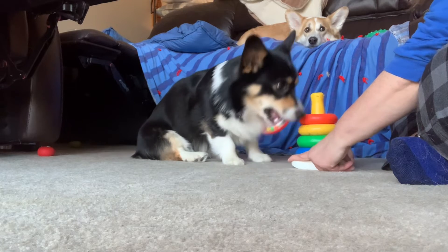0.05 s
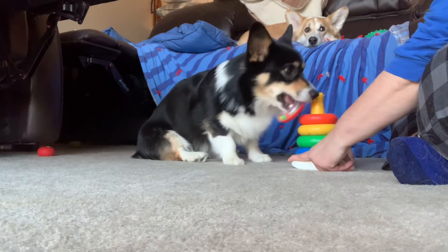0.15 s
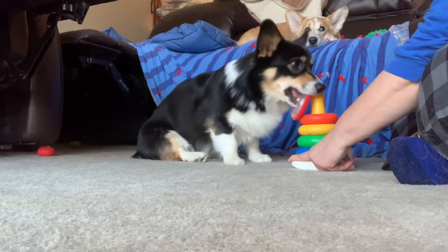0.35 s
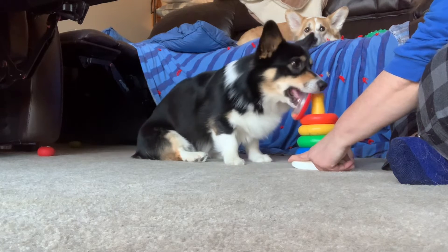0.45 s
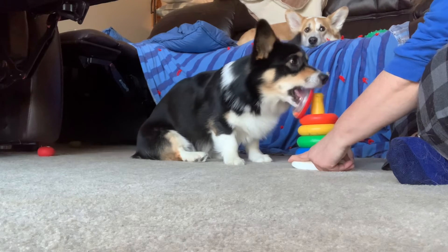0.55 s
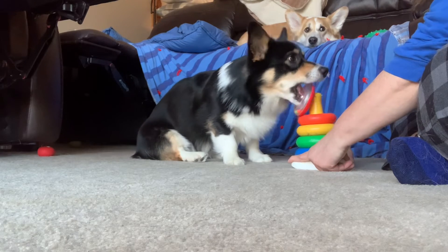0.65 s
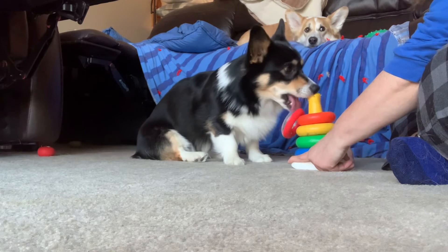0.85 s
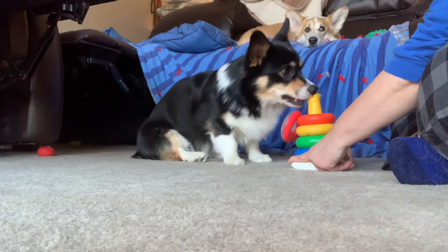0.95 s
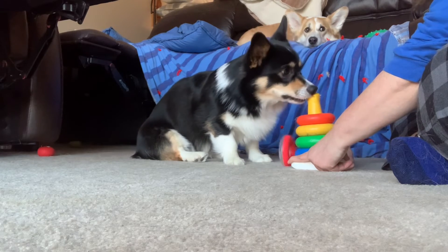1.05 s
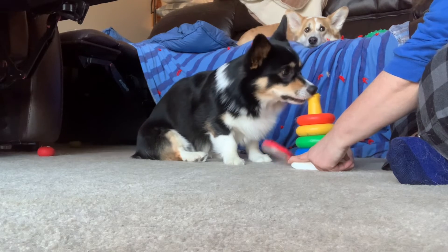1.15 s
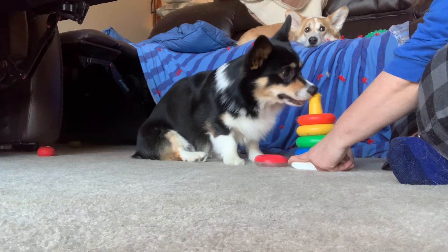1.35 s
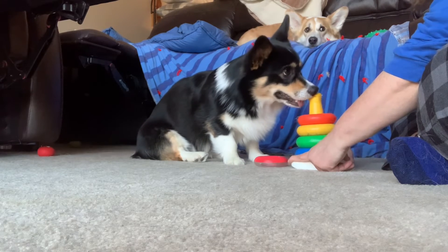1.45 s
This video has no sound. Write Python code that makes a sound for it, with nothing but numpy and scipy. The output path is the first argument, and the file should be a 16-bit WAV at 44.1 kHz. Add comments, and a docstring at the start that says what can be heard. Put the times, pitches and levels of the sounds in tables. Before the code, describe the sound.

Plastic toy ring clacking on a post and a dog's teeth, then falling with a rattle.

```python
"""A carpeted living room on a stereo microphone pair, near a dog working a ring against a stacking toy. A low
hum and faint room noise run throughout. The hollow plastic ring cracks and knocks on the post, then at 0.2 s
clicks on the dog's teeth, with dull thuds through the floor. From 0.6 s it scrapes along the post and knocks
again. Near 1.2 s it drops on the carpet, its beads rattle, and a bead rings with two brief, rough high tones.
Every contact reaches the microphones with the short echo of the room."""
import sys
import numpy as np
from scipy import signal
from scipy.fft import rfft, irfft
from scipy.io import wavfile
from scipy.ndimage import uniform_filter1d

SR = 44100
rng = np.random.default_rng(int(sys.argv[2]) if len(sys.argv) > 2 else 0)


def int16_out(signal):
    """Quantize to a 16-bit WAV file."""
    q = np.round(np.clip(np.atleast_2d(signal).T, -1, 1) * 32767)
    wavfile.write(sys.argv[1], SR, q.astype(np.int16))


N = 66150
LEAD = SR // 5  # samples for contacts that ring in from before time zero
LOW_LAG_S, HIGH_LAG_S, CLICK_PAN_DB = .0003, -.00018, -2.5  # nominal left against right, see place()

# steady hum in the room: (frequency [Hz], rms level [dB])
HUM_PARTIALS = [(80.7, -58.5), (161.5, -69)]
# spectrum of the room noise: (frequency [Hz], relative level [dB])
ROOM_TONE = [(20, -12.5), (40, -13), (65, -13.5), (120, -1.5), (220, -16.5), (400, -22.5), (700, -27.5),
             (1200, -32.5), (2500, -37), (6000, -37.5), (13500, -39.5), (15000, -60)]
# high modes of the ring: (frequency [Hz], relative level [dB], t60 [s])
RING_MODES = [(3220, -11, 0.16), (4016, 2, 0.085), (5540, -19, 0.3), (6070, -16.5, 0.2), (5800, -8, .14),
              (6900, -16.5, 0.069), (7072, -2, 0.05), (7580, -1, 0.056), (11100, -5.5, 0.082),
              (10200, 4, 0.065), (11100, -8.5, .09), (12790, -17.5, 0.031)]
# hard cracks of the rim on the toy: (time [s], level [dB], middle boost [dB], top boost [dB])
RIM_HITS = [(-.06, -26.5, 3, -10.5), (.095, -73, 31.5, -10.5), (.178, -35.5, 14.5, 2),
            (.1865, -30, 14, 3.5), (.192, -23, -20, -3), (.2062, -18.5, 9, 9), (.2088, -12.5, -3, 2),
            (.2102, -7, 0, 6.5), (.2135, -20, 4, -5), (.2775, -30, 3.5, 7.5), (.5825, -49, 22.5, -2.5),
            (.7908, -35.5, 14.5, 2.5), (.7985, -29, 11, -4.5), (.803, -35.5, 18, 3), (.9855, -40, 10, 11),
            (.988, -37.5, 19, 2), (.998, -36.5, 16, -12), (1.0048, -39, 12.5, 7), (1.474, -59, 14, -8),
            (1.491, -48.5, 0.5, -28)]
# spectrum of a rim crack: (frequency [Hz], gain [dB])
RIM_EQ = [(80, -16), (400, 4.5), (900, -3.5), (1200, -10.5), (1560, 1), (2150, -3.5), (2500, -4.5),
          (3200, 2), (4200, -2), (5400, 1.5), (6700, 5.5), (8600, -1.5), (11500, -1), (13500, -2.5),
          (15500, -29)]
# ring knocking on the toy: (time [s], level [dB], pitch [Hz], body mode [Hz], body gain [dB], pan [dB])
POST_KNOCKS = [(-.02, -37, 587, 314, -10.5, 0), (.1795, -43.5, 986, 464, -3, -2),
               (.183, -35, 844, 424, -7, -4), (.191, -47, 810, 388, 0.5, 21),
               (0.2077, -15, 824.4, 412.5, -11.5, -2.5), (0.585, -46, 1040, 415, -14, -6.5),
               (.6285, -34.5, 606, 389, -7, -2), (.64, -46.5, 432, 213, -6, 13),
               (.664, -44, 574, 214, -2.5, 0.5), (.697, -47, 780, 377, -4.5, -4.5),
               (.7275, -34.5, 624, 384, -22, -1), (.792, -24.5, 755, 474, -12, -10.5),
               (0.8002, -23, 838, 490, -2.5, -2.5), (.8185, -42.5, 516, 356, 7, 5.5),
               (0.9874, -23, 657, 335.5, -14.5, -0.5), (0.9875, -36.5, 1102, 231, -6, -10),
               (1.004, -39.5, 830, 326, -9, -4), (1.0107, -38, 444, 348, -1.5, -2),
               (1.169, -51, 990, 449, 2.5, 1), (1.282, -58, 587, 297, -14.5, -5),
               (1.474, -56, 820, 449, -1, -7.5)]
# upper modes of the hollow toy: (multiple of the pitch [ratio], relative level [dB], t60 [s])
SHELL_MODES = [(1.18, -22.5, 0.012), (1.63, -32.5, 0.09), (2.4, -28.5, 0.019)]
# teeth slipping on the ring: (time [s], level [dB], middle boost [dB], top boost [dB])
TOOTH_HITS = [(.196, -15.5, -16, -3), (.2604, -13, -7, -6), (.662, -32, 13, -14), (.705, -25, 0.5, -7.5)]
# spectrum of a tooth click: (frequency [Hz], gain [dB])
TOOTH_EQ = [(300, -30), (2000, -21.5), (3200, -8.5), (4500, -7.5), (6000, -3), (7000, 0.5), (8500, -3),
            (12500, -6.5), (15500, -17)]
# thuds through the carpet and the toy's base: (time [s], level [dB], pitch [Hz], t60 [s])
FLOOR_THUDS = [(.214, -43, 165, 0.094), (0.226, -44.5, 99, 0.14), (0.237, -55.5, 59.5, 0.15),
               (0.242, -53, 158.8, 0.16), (0.596, -47, 135.5, 0.075), (.712, -53, 224, 0.064),
               (0.804, -35, 219.5, 0.06), (0.812, -37, 87.6, 0.046), (0.9912, -29, 249, 0.028),
               (1.025, -37, 70.5, 0.096), (1.029, -48.5, 200, 0.084), (1.173, -29, 287.5, 0.021),
               (1.1756, -31.5, 80, 0.067), (1.202, -41.5, 170, 0.035), (1.246, -48, 118.4, 0.082),
               (1.304, -53, 68.7, 0.21), (1.48, -48.5, 174, 0.063)]
# ring sliding on the post: (time [s], length [s], level [dB], first pitch [Hz], last pitch [Hz])
POST_SCRAPES = [(0.582, 0.017, -46, 875, 255), (0.605, 0.048, -53.5, 627, 550),
                (0.701, 0.038, -48, 352, 927)]
# the dropped ring clattering: (time [s], level [dB], middle boost [dB], top boost [dB])
CLATTER_HITS = [(1.188, -23.5, -2, 11.5), (1.1897, -21, -1, 8.5), (1.1995, -28, 9.5, 1),
                (1.2042, -15.5, -1, -0.5), (1.215, -25.5, 0.5, 4), (1.2465, -37, -11, 1),
                (1.251, -25, -13.5, 4.5), (1.2888, -26, -6.5, 0.5), (1.302, -31, -11, -5.5)]
# spectrum of the clatter and the beads: (frequency [Hz], gain [dB])
CLATTER_EQ = [(200, -17), (750, -19), (1150, -32), (1500, -2.5), (2100, -11.5), (2650, -16), (3200, 0.5),
              (3700, -7), (4200, -7.5), (5400, 3), (7000, -2), (8600, -3), (11500, -3), (13800, -7.5),
              (15200, -39.5)]
# brief high rings of a bead: (time [s], level [dB], pitch [Hz])
BEAD_PINGS = [(1.289, -52, 6360), (1.296, -51, 4210)]
# decay of the living room: (frequency [Hz], t60 [s])
ROOM_DECAY = [(80, 1), (200, 0.52), (340, 0.37), (520, 0.42), (850, 0.23), (1700, 0.28), (3500, .33),
              (6000, 0.29), (10000, 0.17), (15000, 0.09)]
# likeness of diffuse sound at the two microphones: (frequency [Hz], correlation [0-1])
MIC_COHERENCE = [(80, .95), (300, 0.56), (1000, 0.035), (4000, 0.04), (15000, 0.24)]


def amp(db):
    """Decibels to gain."""
    return 10 ** (np.asarray(db) / 20)


def read(points, hz):
    """Reads a table on a log-frequency axis."""
    f, value = np.transpose(points)
    return np.interp(np.log(hz + 1), np.log(f + 1), value)


def unit(x):
    """Scales to energy one."""
    return x / np.sqrt(np.sum(x ** 2, -1, keepdims=True) + 1e-20)


def decay(t, t60):
    """Falls 60 dB in t60 seconds."""
    return np.exp(-np.log(1000) * t / t60)


def mode(t, hz, t60):
    """One dying sine."""
    return np.sin(2 * np.pi * hz * t) * decay(t, t60)


def minimum_phase(db):
    """Shortest impulse response with the given spectrum."""
    cepstrum = irfft(np.log(amp(db)))
    half = len(cepstrum) // 2
    cepstrum[1:half] *= 2
    cepstrum[half + 1:] = 0
    return irfft(np.exp(rfft(cepstrum)))


def flatten(x, bins):
    """Evens out the peaks and dips of a noise burst's spectrum."""
    spectrum = rfft(x)
    power = abs(uniform_filter1d(abs(spectrum) ** 2, bins))
    return irfft(spectrum / np.sqrt(power + 1e-20), x.shape[-1])


def place(mix, time_s, sound, pan_db, lag_s):
    """Sets a sound on the pair: the left microphone is louder by 0.9 * pan_db, later by 0.9 * lag_s."""
    for channel, side in ((0, 0.45), (1, -0.45)):
        start = max(LEAD + round(time_s * SR) + round(side * lag_s * SR), 0)
        part = mix[channel, start:start + len(sound)]
        part += amp(side * pan_db) * sound[:len(part)]


def diffuse_noise(size):
    """Noise from all sides at the two microphones, alike in the bass."""
    left, other = rfft(rng.standard_normal((2, size)))
    likeness = read(MIC_COHERENCE, np.fft.rfftfreq(size, 1 / SR))
    right = likeness * left + np.sqrt(1 - likeness ** 2) * other
    return irfft([left, right], size)


def room_tone(noise_rms_db=-69):
    """The room by itself: a steady low hum in dull noise."""
    t = np.arange(N) / SR
    colour = amp(read(ROOM_TONE, np.fft.rfftfreq(N, 1 / SR)))
    air = irfft(rfft(diffuse_noise(N)) * colour, N)
    hum = sum(np.sqrt(2) * amp(db) * np.sin(2 * np.pi * (hz * t + rng.random()))
              for hz, db in HUM_PARTIALS)
    return amp(noise_rms_db) * np.sqrt(N) * unit(air) + hum


def clicks(hits, colour, crack_t60_s, ring_db):
    """Each hard contact is a brief crack followed by the high modes of the ring."""
    out, t = np.zeros((2, LEAD + N)), np.arange(SR // 8) / SR
    hz = np.fft.rfftfreq(2048, 1 / SR)
    middle = read([(2000, 1), (5000, 0)], hz)  # shelf, full below 2 kHz
    top = read([(7000, 0), (11000, 1)], hz)  # shelf, full above 11 kHz
    modes = np.array([amp(db) * mode(t, f, t60) for f, db, t60 in RING_MODES])
    for time_s, db, middle_db, top_db in hits:
        burst = rng.standard_normal(len(t)) * decay(t, crack_t60_s)
        crack = unit(flatten(burst, bins=150) * (t < t[-1] / 2))
        ringing = unit(rng.choice([-1, 1], len(modes)) @ modes)
        tone_filter = minimum_phase(read(colour, hz) + middle_db * middle + top_db * top)
        click = signal.fftconvolve(crack + amp(ring_db) * ringing, tone_filter)
        place(out, time_s, 2 * amp(db) * click, CLICK_PAN_DB, HIGH_LAG_S)
    return out


def rim_cracks():
    """The ring's hard rim strikes the toy."""
    return clicks(RIM_HITS, RIM_EQ, crack_t60_s=0.013, ring_db=-24)


def knocks(hits, pitch_t60_s=0.013, body_t60_s=0.028, contact_s=0.0011):
    """Soft contacts ring the heavily damped hollow body for a few cycles."""
    out, t = np.zeros((2, LEAD + N)), np.arange(SR // 10) / SR
    attack = 1 - np.exp(-t / contact_s)
    for time_s, db, hz, body_hz, body_db, pan_db in hits:
        body = mode(t, hz, pitch_t60_s) + amp(body_db) * mode(t, body_hz, body_t60_s)
        shell = sum(amp(mode_db) * mode(t, hz * ratio, t60) for ratio, mode_db, t60 in SHELL_MODES)
        place(out, time_s, 2 * amp(db) * attack * (body + shell), pan_db, LOW_LAG_S)
    return out


def tooth_clicks():
    """The dog's teeth slip on the plastic with bright clicks."""
    return clicks(TOOTH_HITS, TOOTH_EQ, crack_t60_s=0.018, ring_db=-22.5)


def thuds(rise_s=0.0031):
    """Low, quickly damped pushes on the floor, a little louder at the left microphone."""
    out, t = np.zeros((2, LEAD + N)), np.arange(SR // 3) / SR
    attack = 1 - np.exp(-t / rise_s)
    for time_s, db, hz, t60 in FLOOR_THUDS:
        place(out, time_s, -2 * amp(db) * attack * mode(t, hz, t60), pan_db=3.5, lag_s=LOW_LAG_S)
    return out


def scrape_slips(slips_per_s=260, spread_octaves=0.13, spread_db=2.5, body_ratio=0.407, body_db=-8.5):
    """A scrape is a quick, uneven run of faint knocks whose pitch glides as the contact moves."""
    hits = []
    for start_s, length_s, db, first_hz, last_hz in POST_SCRAPES:
        for age in np.arange(0, length_s, 1 / slips_per_s):
            jitter, strength, detune = rng.standard_normal(3)
            glide_hz = first_hz + (last_hz - first_hz) * age / length_s
            hz = glide_hz * 2 ** (spread_octaves * detune)
            time_s = start_s + age + jitter / 2 / slips_per_s
            hits.append((time_s, db + spread_db * strength, hz, hz * body_ratio, body_db, 0))
    return hits


def clatter_and_beads(start_s=1.195, end_s=1.308, beads_per_s=360, first_db=-38.5, fade_db_per_s=105):
    """The dropped ring clatters, and the loose beads inside settle in ever weaker clicks."""
    beads = []
    for i in range(int((end_s - start_s) * beads_per_s)):
        age = (i + rng.normal(0, 0.5)) / beads_per_s
        db = first_db - fade_db_per_s * age + rng.normal(0, 3)
        beads.append((start_s + age, db, 0, 0))
    return clicks(CLATTER_HITS + beads, CLATTER_EQ, crack_t60_s=0.0089, ring_db=-12)


def bead_pings(length_s=0.016, wander_hz=170, roughness=0.45):
    """A bead rings briefly: short, rough high tones of unsteady pitch."""
    out, t = np.zeros((2, LEAD + N)), np.arange(0, length_s, 1 / SR)
    for time_s, db, hz in BEAD_PINGS:
        smooth_noise = uniform_filter1d(rng.standard_normal((2, len(t))), size=40)
        wander, flutter = unit(smooth_noise) * np.sqrt(len(t))
        tone = np.sin(2 * np.pi * np.cumsum(hz + wander_hz * wander) / SR)
        envelope = np.sin(np.pi * t / length_s) * (1 + roughness * flutter)
        place(out, time_s, amp(db) * envelope * tone, CLICK_PAN_DB, HIGH_LAG_S)
    return out


def room(direct, wet_db, early_db, onset_s=0.0028, early_s=0.016):
    """Dense early reflections and a short tail follow the direct sound to the microphones."""
    noise = diffuse_noise(SR // 2)
    t = np.arange(noise.shape[1]) / SR
    onset = 1 - np.exp(-(t / onset_s) ** 2)
    early_lift = amp(early_db * np.exp(-t / early_s))
    hz, frame_s, bands = signal.stft(noise * onset * early_lift, SR, nperseg=256)
    _, tail = signal.istft(bands * decay(frame_s, read(ROOM_DECAY, hz)[:, None]), SR)
    response = unit(flatten(tail, bins=220)[:, :SR // 3])
    echo = signal.fftconvolve(direct, response, axes=1)[:, :LEAD + N]
    return (direct + amp(wet_db) * echo)[:, LEAD:]


def scene():
    """All contacts as heard from the microphone position, over the room tone."""
    return (room_tone()
            + room(rim_cracks(), wet_db=-2.5, early_db=9.5)
            + room(knocks(POST_KNOCKS + scrape_slips()), wet_db=-8.5, early_db=15)
            + room(tooth_clicks(), wet_db=-2, early_db=6.5)
            + room(thuds(), wet_db=-8.5, early_db=9.5)
            + room(clatter_and_beads(), wet_db=1, early_db=2)
            + room(bead_pings(), wet_db=-7.5, early_db=-14))


def record(dry):
    """A low cut at 51 Hz, and the recorder's band limit at 16.5 kHz."""
    low_cut = signal.butter(3, 51, "high", fs=SR, output="sos")
    band_limit = signal.firwin(511, 16500, window=("kaiser", 9), fs=SR)
    return signal.oaconvolve(signal.sosfilt(low_cut, dry), band_limit[None], "same")


dry = scene()
out = record(dry)
int16_out(out)
```